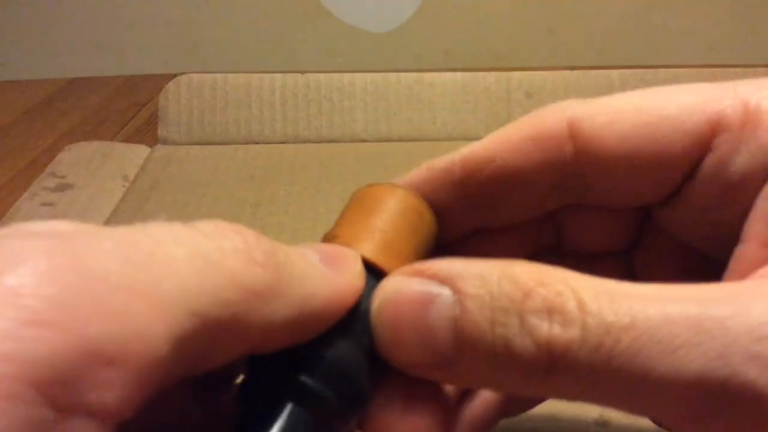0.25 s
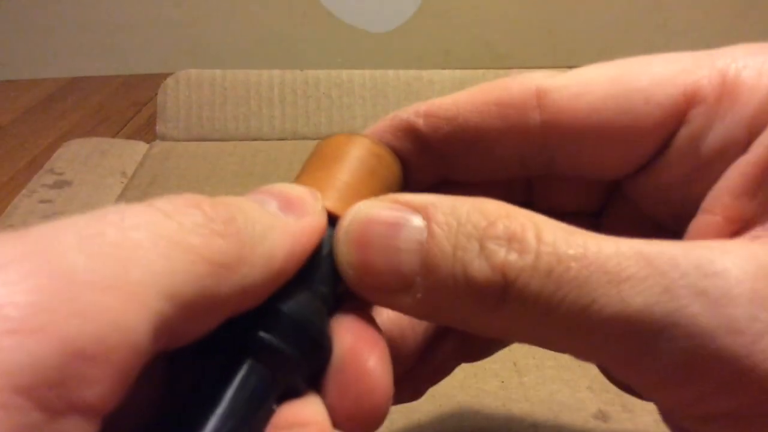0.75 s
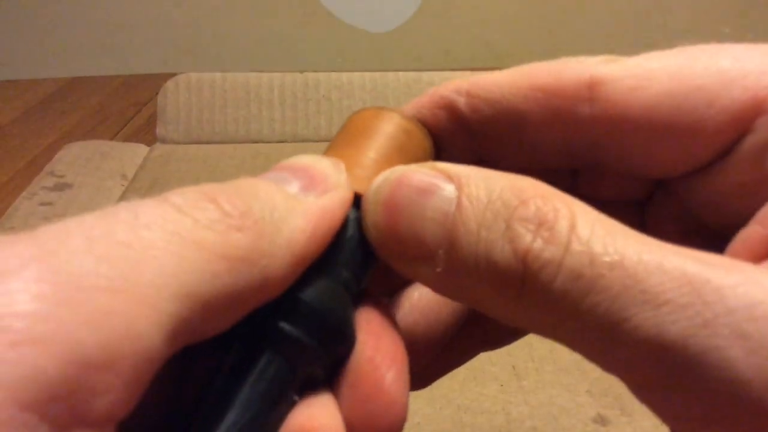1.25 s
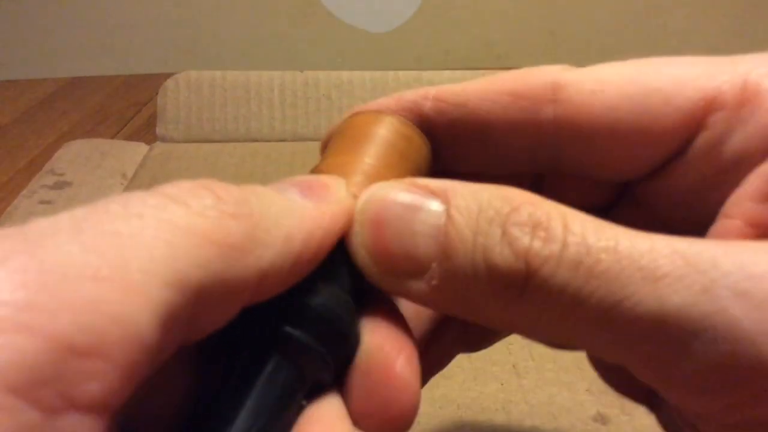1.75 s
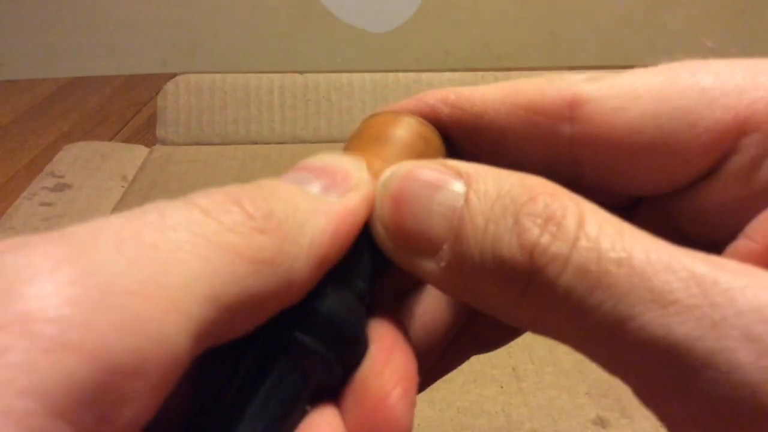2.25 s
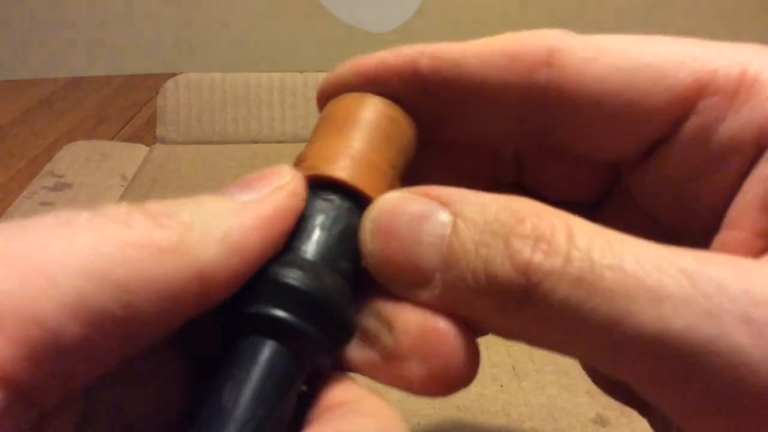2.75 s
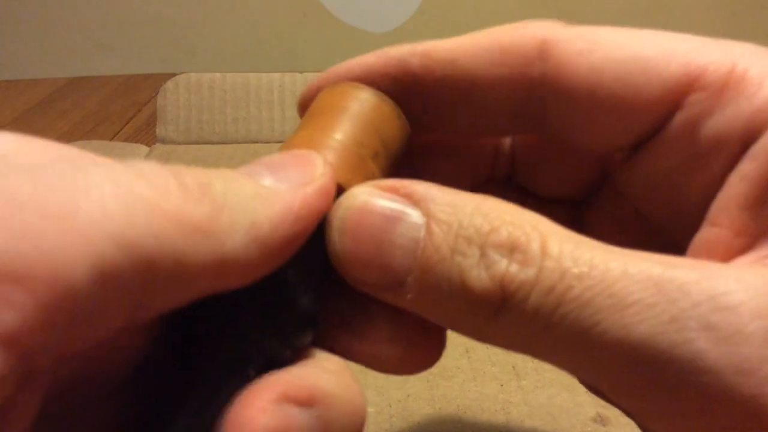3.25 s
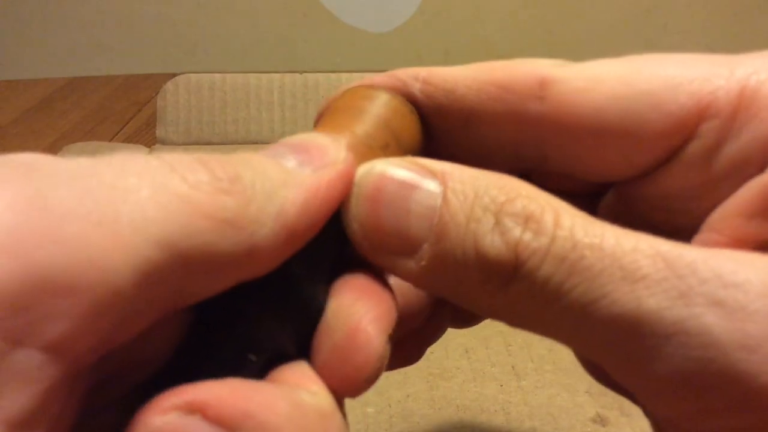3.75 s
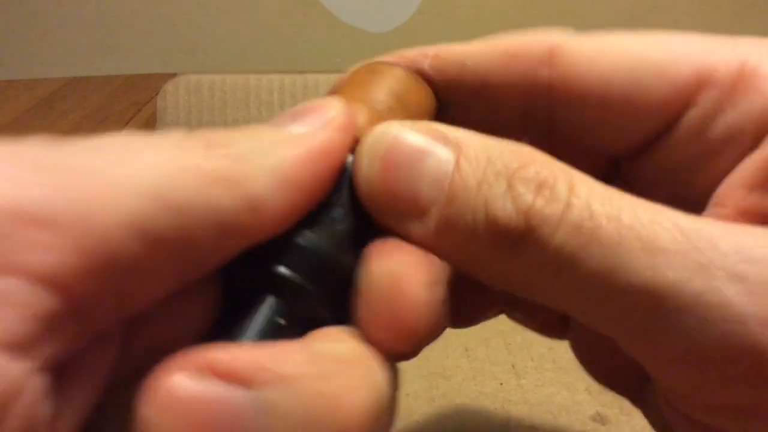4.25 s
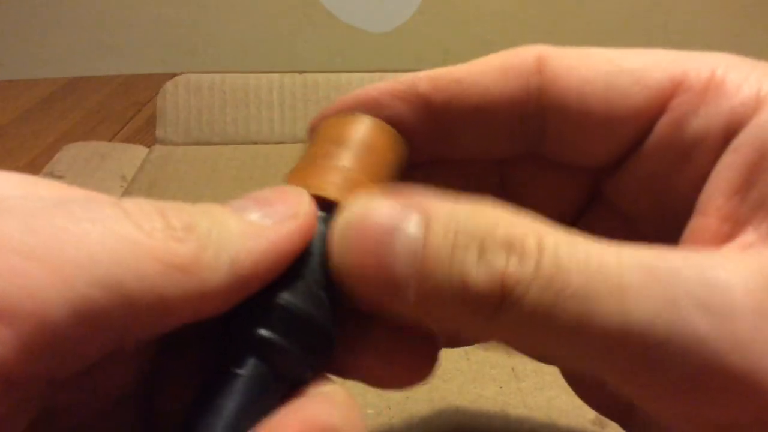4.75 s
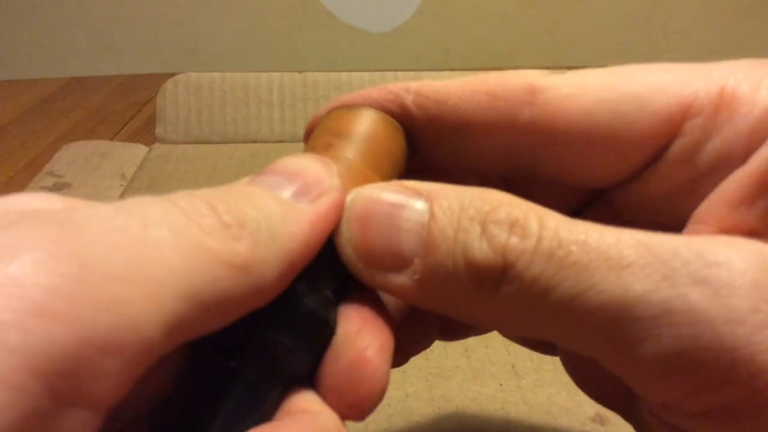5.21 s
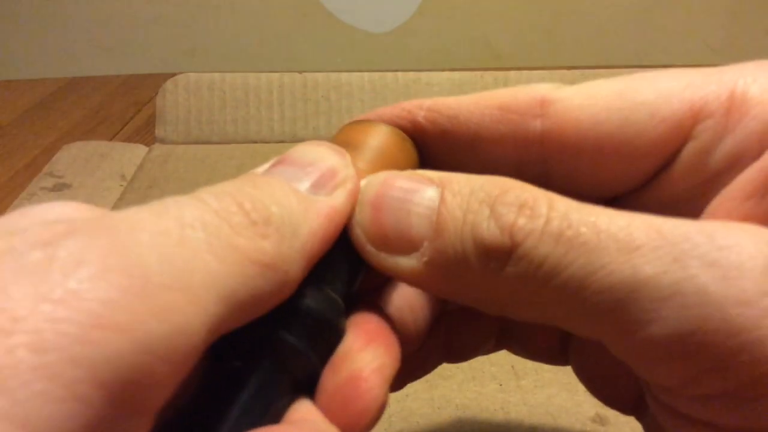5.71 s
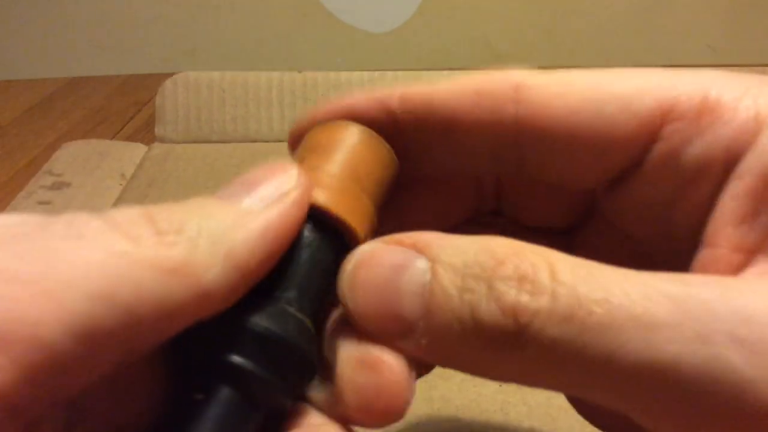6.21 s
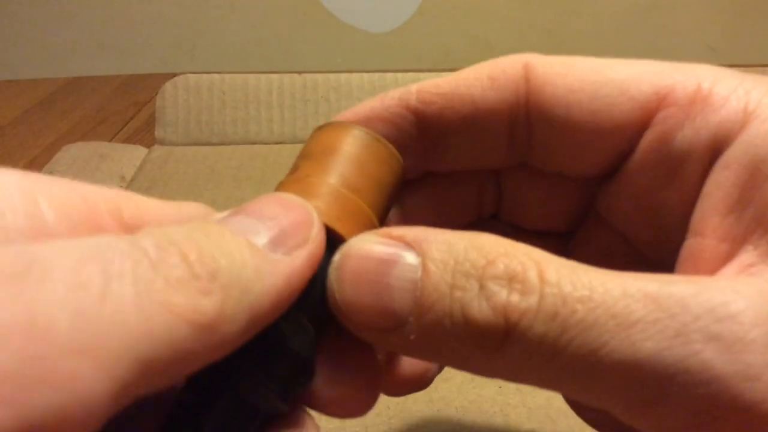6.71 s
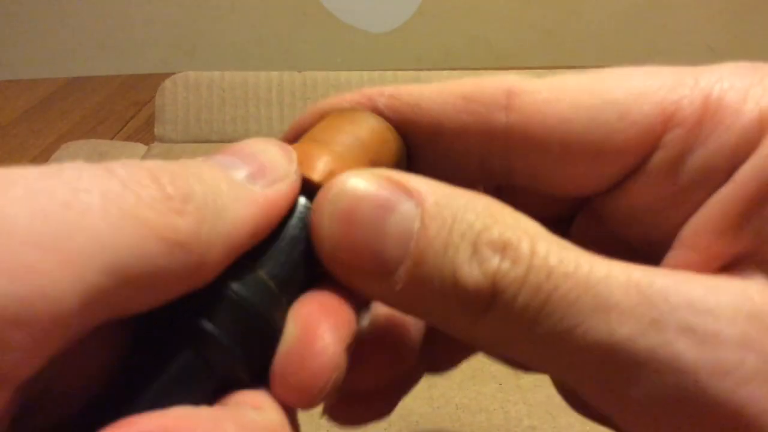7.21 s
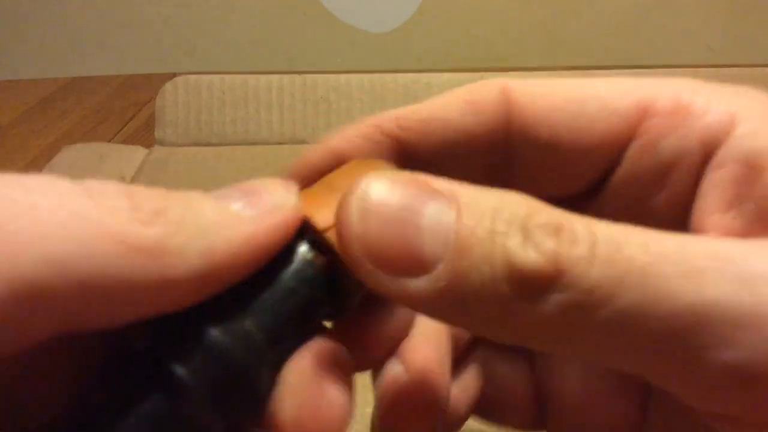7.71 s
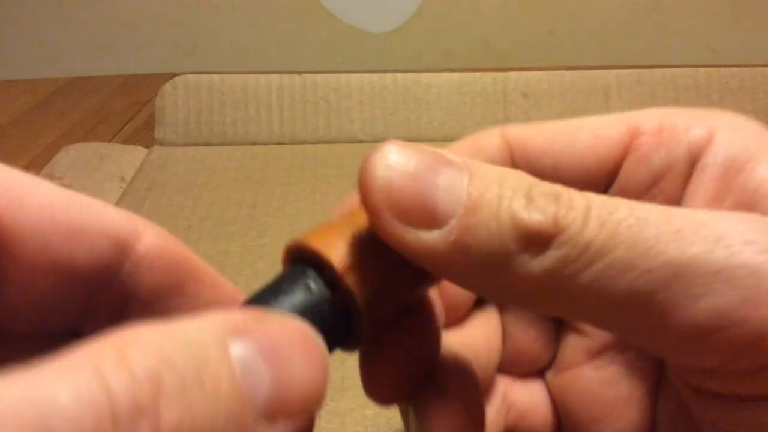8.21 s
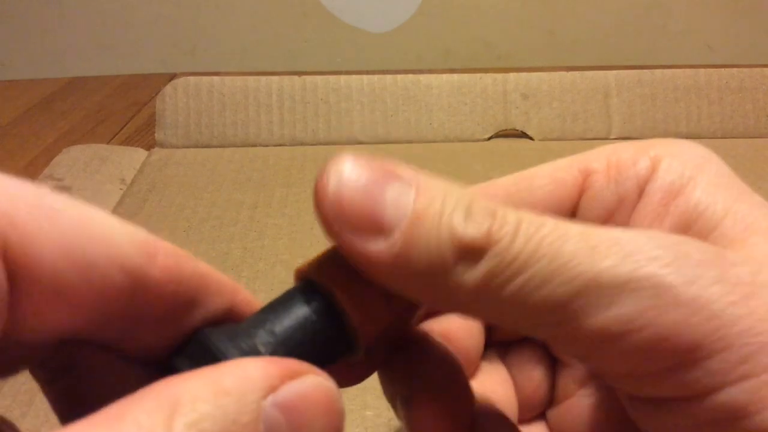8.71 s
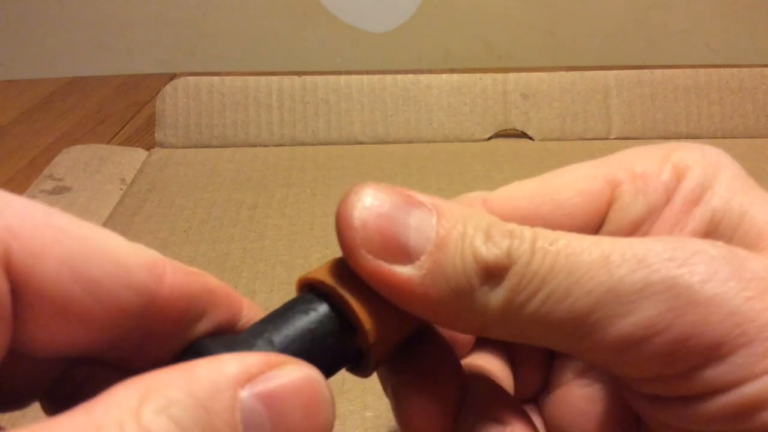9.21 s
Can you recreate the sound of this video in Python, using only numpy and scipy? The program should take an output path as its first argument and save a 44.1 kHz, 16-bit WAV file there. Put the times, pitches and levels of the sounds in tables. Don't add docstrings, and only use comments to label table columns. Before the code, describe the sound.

Close, soft skin-on-rubber friction with small table knocks, brittle peeling snaps, a muted pop and later a big sharp pop over low room hum.

```python
import sys
import numpy as np
from scipy import signal
from scipy.fft import rfft, irfft, next_fast_len
from scipy.io import wavfile

SR = 44100
rng = np.random.default_rng(int(sys.argv[2]) if len(sys.argv) > 2 else 0)


def makeup_ratio(level_db):
    decades = np.asarray(level_db, float) / 20
    return 10 ** decades


def wav_record(signal):
    frames = np.transpose(np.atleast_2d(signal))
    bounded = np.clip(frames, -1, 1)
    quanta = np.round(bounded * 32767).astype(np.int16)
    wavfile.write(sys.argv[1], SR, quanta)


N = 417186

# [f/Hz, level/dB per Hz]
ROOM_SPECTRUM = [(50, -8), (100, -7), (230, -0.75), (300, -2), (400, -8), (546, -11), (750, -20.5),
                 (1140, -24.5), (2000, -33), (2400, -30.5), (4300, -28.5), (7000, -40.5), (14300, -28.5)]
# [f/Hz, level/dB rms]
APPLIANCE_TONES = [(97, -73.5), (221, -71), (318, -74.5), (538, -72), (587, -78), (738, -80.5)]
# [t/s, level/dB, swell/s, t60/s]
RATTLES = [
    (0.479, -48.5, 0.034, 0.21),
    (4.484, -44, 0.008, 0.074),
    (5.912, -43.5, 0.0094, .15),
    (0.24, -62, 0.0065, 0.045),
]
# [t/s, cardboard peak level/dB, boom level/dB, edge level/dB, t60/s]
KNOCKS = [(0.002, -61, -52, -53, 0.15), (0.2622, -35.5, -37, -41.5, 0.05),
          (0.4761, -25.5, -28, -20.5, 0.26), (1.375, -95.5, -55, -76, 0.13), (1.6, -74, -52, -73, 0.27),
          (4.482, -28.5, -34.5, -28.5, 0.11), (5.908, -64, -38, -12, 0.075), (6.038, -58, -54, -61, 0.1),
          (6.109, -49.5, -49, -65, 0.17), (7.08, -49, -47, -60, 0.12), (7.887, -38, -43.5, -46, 0.027),
          (8.133, -42.5, -46, -63.5, 0.2)]
# [f/Hz, level/dB, share of t60]
TABLE_MODES = [(79.6, 7, 1), (108, 4.5, 0.76), (142, 1, 1.3)]
# [f/Hz, level/dB, share of t60]
CARD_MODES = [(308.2, 7.5, 0.45), (382, -5.5, 0.88), (505.7, -8, 0.84), (688, -25.5, 0.53)]
# [f/Hz, level/dB, share of t60]
EDGE_MODES = [(976, -7.5, 0.62), (1110, 1, 0.1484), (1450, -3, 0.13), (1570, 3.5, 0.052),
              (1757, -5.5, 0.058), (2260, 1, 0.08), (2800, -15.5, 0.22)]
# [t/s, peak level/dB, f/Hz, t60/s]
PLOPS = [(0.44, -50, 1420, 0.025), (2.8942, -49, 1670, 0.025), (2.9244, -50, 1570, 0.022),
         (2.9641, -53, 1650, .012), (3.0122, -48.5, 1560, 0.015), (3.0193, -53, 1600, 0.023),
         (3.0504, -60, 1800, .015), (5.882, -35, 1450, 0.02), (5.9064, -20, 4100, .008),
         (5.879, -32, 4400, .01), (7.889, -51, 2330, 0.03), (9.0717, -52.5, 2330, 0.0058)]
# [t/s, peak
# level/dB, f/Hz]
NAIL_TICKS = [(0.41, -46, 2310), (0.4384, -46, 3080), (3.7025, -55, 3340), (3.777, -54, 4180),
              (3.908, -53, 3150), (4.2522, -56, 2910), (4.75, -52, 3040), (5.2214, -60, 3130),
              (5.3961, -61, 2900), (5.4964, -53, 3260), (5.5458, -52, 3140), (5.5648, -50, 2850),
              (6.097, -52, 2170), (6.278, -53, 2330), (6.4781, -57, 1878), (8.206, -54.5, 2330)]
# [f/Hz, level/dB per Hz]
SKIN_SPECTRUM = [(1200, -16.5), (3000, -11), (4760, -11.5), (6000, -12.5), (8000, -11.5), (10500, -11.5),
                 (14000, -7), (15500, -7)]
# [t/s, tilt added to the hiss/dB per octave]
TIGHTNESS = [(0.0, -2.5), (0.4, -0.5), (2.59, -1), (3.96, 0), (4.05, 4.5), (4.33, -0.5), (4.79, 7.5),
             (5.09, -2), (5.58, -1), (5.66, 4.5), (5.75, 8.5), (5.86, 3), (5.93, -3.5), (6.33, 0), (6.4, 6),
             (6.5, 2.5), (6.86, 0), (9.46, 0.5)]
# [peak t/s, hiss level/dB, rise/s, fall/s]
TWISTS = [(0.024, -53.5, 0.071, 0.015), (0.49, -58.5, 0.35, 0.35), (0.62, -59.5, 0.2, 0.42),
          (1.017, -62.5, 0.24, 0.3), (1.55, -59, 0.051, 0.071), (1.68, -61.5, 0.41, 0.26),
          (2.356, -53.5, 0.13, 0.053), (2.702, -58, 0.088, 0.15), (2.9, -63.5, 0.34, 0.2),
          (3.134, -68.5, 0.8, 1), (3.972, -57, 0.014, 0.055), (4.02, -64, 0.011, 0.076),
          (4.387, -58, 0.18, 0.17), (4.556, -55, 0.13, 0.21), (4.72, -58, 0.29, 0.18),
          (4.85, -61, .1, 0.058), (5.625, -55.5, 0.011, 0.09), (5.69, -54.5, 0.11, 0.06),
          (5.875, -40.5, 0.061, 0.076), (5.96, -53, 0.057, 0.11), (6.137, -57, 0.21, 0.29),
          (6.432, -54.5, 0.15, 0.079), (6.86, -60.5, 0.054, 0.11), (6.97, -70.5, 0.06, 0.18),
          (7.103, -50.5, 0.081, 0.22), (7.269, -52.5, 0.07, 0.13), (7.66, -51.5, 0.11, 0.13),
          (7.895, -50.5, 0.011, 0.058), (8.026, -54, 0.098, 0.11), (8.244, -61, 0.079, 0.12),
          (8.58, -69.5, 0.58, 0.12)]
# [peak t/s, hiss level/dB]
BRUSHES = [(0.27, -59.5), (1.458, -60.5), (1.81, -60), (1.988, -61.5), (2.078, -59), (2.24, -74),
           (2.595, -57.5), (3.368, -60.5), (2.865, -56.5), (3.518, -60), (5.099, -64.5), (5.238, -61.5),
           (5.34, -66), (5.482, -67.5), (5.777, -54.5), (7.7, -58), (8.369, -60.5), (8.69, -69)]
# [peak t/s, hollow level/dB, squeeze level/dB, length/s]
PRESSES = [(0.016, -54, -58, 0.03), (0.32, -66, -65.5, 0.2), (0.503, -80, -46, 0.11),
           (1.02, -67.5, -73, 0.26), (2.34, -57, -52.5, 0.042), (2.686, -54, -66, 0.035),
           (3.37, -65, -68, 0.089), (4.488, -54, -41, 0.037), (5.085, -68, -85, 0.15),
           (5.887, -62, -45, 0.031), (6.058, -59, -45.5, 0.032), (6.073, -74, -55.5, 0.025),
           (6.128, -66, -48, 0.028), (6.162, -67, -52.5, 0.061), (6.217, -64, -51.5, 0.044),
           (6.437, -75.5, -60.5, 0.092), (6.872, -62.5, -60, 0.16), (6.955, -69, -65.5, 0.15),
           (7.078, -56, -67, 0.052), (7.111, -50.5, -48.5, 0.074), (7.169, -50.5, -50, 0.077),
           (7.266, -52.5, -46, 0.054), (7.296, -50, -60, 0.045), (7.648, -51.5, -47, 0.083),
           (7.696, -72, -47, 0.038), (7.905, -49.5, -46, 0.018), (8.022, -63, -58.5, 0.11),
           (8.236, -69.5, -54.5, 0.11), (8.37, -71, -67, .05)]
# [peak t/s, level/dB, length/s]
CUPPINGS = [(0.01, -73, .04), (0.392, -78, 0.24), (0.514, -60, 0.1), (1.468, -69, 0.035),
            (1.556, -52, 0.038), (2.24, -100, 0.087), (2.71, -65, 0.045), (2.888, -72, .05),
            (2.995, -74, 0.12), (3.29, -69, 0.1), (4.386, -59, 0.07), (4.616, -56, 0.071),
            (5.018, -65, 0.057), (5.687, -74, .06), (5.901, -42, 0.013), (6.005, -57.5, 0.077),
            (6.295, -69.5, 0.22), (6.952, -73, .2), (7.098, -74, 0.14), (7.661, -71, 0.071),
            (7.804, -67, 0.11), (7.906, -55.5, 0.018), (8.036, -61.5, 0.094), (8.247, -64, .1),
            (8.359, -63, 0.058), (8.453, -67.5, .05), (9.2, -69.5, 0.2), (9.4, -68, 0.31)]
# [t/s, f/Hz]
GRIP_RESONANCE = [(3.0, 1580), (3.249, 1686), (4.34, 1520), (4.419, 1693), (4.62, 1849), (4.999, 1532),
                  (5.899, 1450), (6.3, 1792), (7.93, 1694), (7.971, 2740), (8.13, 2688), (8.17, 1846),
                  (8.45, 2118), (9.001, 1730)]
# [t/s, peak level/dB, loudest f/Hz, t60/s]
SNAPS = [(0.2633, -41, 7050, 0.031), (0.4095, -31, 14700, 0.023), (0.473, -31.5, 12800, 0.025),
         (2.3106, -14.5, 12700, 0.015), (2.325, -7.5, 13900, 0.0076), (2.3293, -19, 8100, 0.017),
         (2.3369, -12, 7440, 0.0034), (2.3404, -14.5, 7800, 0.0023), (2.3487, -12.5, 5500, 0.011),
         (2.354, -22, 7250, 0.029), (2.3663, -27, 6440, 0.0043), (3.9615, -17.5, 8870, 0.0089),
         (3.9752, -29.5, 13200, 0.0022), (4.0164, -36.5, 8960, 0.027), (4.4807, -31.5, 3540, 0.048),
         (5.6132, -17, 9300, 0.0098), (5.685, -30, 10500, 0.0059), (5.7052, -23.5, 12000, .0093),
         (5.7603, -28, 10100, 0.0089), (5.778, -26.5, 12520, 0.032), (5.7887, -27.5, 10530, 0.0042),
         (5.806, -35.5, 10260, 0.031), (5.8282, -25, 10390, 0.0072), (5.8518, -22.5, 13600, .013),
         (5.8564, -21.5, 10490, 0.0092), (5.8781, -14, 9670, 0.026), (5.908, -7.5, 13550, 0.0077),
         (7.3636, -32, 7000, 0.0084), (9.071, -31, 12000, 0.0094)]
# [t/s, peak level/dB]
TICKS = [(0.5852, -44), (1.3037, -55), (1.3705, -50), (1.4011, -42), (1.4045, -41.5), (1.4769, -44),
         (2.3225, -25), (2.2583, -31), (2.2814, -48), (2.2930, -32), (2.3048, -28), (2.4189, -44),
         (2.7466, -45), (2.7549, -44), (3.86, -43), (3.9366, -46), (4.0394, -34), (4.2558, -47),
         (4.2895, -44), (5.5659, -37), (2.3768, -32), (5.7211, -29), (5.8184, -30.5), (5.8451, -33.5),
         (6.2262, -42), (6.2733, -41.5), (7.0542, -38.5), (9.236, -50.5),
         (3.9513, -44), (3.9687, -25), (4.0140, -39.5), (4.023, -37), (5.6806, -35), (5.7351, -44),
               (5.7813, -29), (5.812, -36.5), (5.834, -38), (5.8483, -26.5), (5.8656, -24.5),
               (5.881, -23.5), (9.426, -45)]
# [t/s, peak level/dB, f/Hz, t60/s]
FIRST_CRACK = (5.9068, -16, 9000, .005)
# [t/s, peak level/dB, start f/Hz, end f/Hz, rise/s, t60/s]
POPS = [
    (4.4809, -18, 600, 620, .0029, .018),
    (5.90785, -3, 1500, 1400, .0006, .015),
    (5.9078, -19, 560, 560, .0012, .022),
]

ROOM_DB = -63.5
ROOM_T60_S, ROOM_WET_DB, WALL_CUT_HZ = 0.22, -19.5, 1100
RATTLE_LOW_HZ, RATTLE_HIGH_HZ = 748, 1900
BODY_LAG_S = 0.004
NAIL_T60_S, NAIL_DB = 0.005, 0.5
BRUSH_RISE_S, BRUSH_FALL_S = 0.045, 0.027
STROKE_DEPTH_DB = 18.5
REST_DB, HOLLOW_REST_DB, SQUEEZE_REST_DB, CAVITY_REST_DB = -75, -89, -73.5, -95.5
HOLLOW_BELOW_DB = 16.5
FLICKER_DB, FLICKER_PER_S = 1.1, 12
COLOUR_DB, COLOUR_PER_S = 2.0, 3
TICK_HZ, TICK_T60_S, TICK_SPREAD = 12700, 0.007, 0.1
HEAD_S, HEAD_GAIN = 0.0003, 0.9
BROAD_SHARE = 0.6
MID_SHARE, MID_LOSS_DB = 0.13, 2.2
MIC_LOW_HZ, MIC_TOP_HZ = 55, 15400


def rms_one(x):
    return x / np.sqrt(np.mean(x ** 2) + 1e-20)


def add(out, s, burst):
    at = max(round(s * SR), 0)
    out[at:at + len(burst)] += burst[:N - at]


def drift(rate):
    r = np.exp(-80 * np.pi * rate / SR)
    white = rng.standard_normal(N // 40 + 2002)
    slow = signal.lfilter([1], [1, -2 * r, r * r], white)[2000:]
    return np.interp(np.arange(N) / 40, np.arange(len(slow)), rms_one(slow))


def ring(clicks, hz, t60):
    r, w = makeup_ratio(-60 / (t60 * SR)), 2 * np.pi * hz / SR
    return signal.lfilter([0, np.sin(w)], [1, -2 * r * np.cos(w), r * r], clicks + 1e-18)


def band(x, low_hz, high_hz):
    edges = [low_hz, min(high_hz, 0.48 * SR)]
    return signal.sosfilt(signal.butter(2, edges, "band", fs=SR, output="sos"), x)


def coloured(x, spectrum):
    hz, level_db = np.transpose(spectrum)
    grid = np.maximum(np.fft.rfftfreq(N, 1 / SR), 1)
    gain = makeup_ratio(np.interp(np.log(grid), np.log(hz), level_db))
    return rms_one(irfft(rfft(x) * gain, N))


def grit(per_s, spread_db):
    sizes = makeup_ratio(spread_db * np.minimum(rng.exponential(1, N), 5)) * rng.choice([-1, 1], N)
    catches = sizes * (rng.random(N) < per_s / SR)
    return rms_one(rng.standard_normal(N) + 3.2 * catches)


def strokes(rows, rest_db):
    t, power = np.arange(0, N + 40, 40) / SR, makeup_ratio(2 * rest_db)
    for s, db, rise, fall in rows:
        away = np.where(t < s, (s - t) / max(rise, 0.005), (t - s) / max(fall, 0.005))
        power = power + makeup_ratio(2 * (db - STROKE_DEPTH_DB * np.minimum(away, 10)))
    return np.interp(np.arange(N) / SR, t, np.sqrt(power))


def hum():
    level = makeup_ratio(ROOM_DB + 0.6 * drift(7.7))
    out = level * coloured(rng.standard_normal(N), ROOM_SPECTRUM)
    for hz, db in APPLIANCE_TONES:
        out += makeup_ratio(db - 2.5) * rms_one(ring(rng.standard_normal(N), hz, 0.6))
    return out


def walls(x):
    size = next_fast_len(N + SR)
    w = 2 * np.pi * np.fft.rfftfreq(size)
    dull = 1 / (1 + 1j * w * SR / (2 * np.pi * WALL_CUT_HZ))
    answer = 0
    lags = (rng.uniform(0.0032, 0.038, 10) * SR).astype(int)
    for k, lag in enumerate(lags):
        loop = makeup_ratio(-60 * lag / SR / ROOM_T60_S) * dull * np.exp(-1j * w * lag)
        answer = answer + (-1) ** k * loop / (1 - loop)
    return irfft(rfft(x, size) * answer, size)[:N]


def rattles():
    out, t = np.zeros(N), np.arange(12000) / SR
    noises = rng.standard_normal((len(RATTLES), 2, 12000))
    for (s, db, swell, t60), (noise, wander) in zip(RATTLES, noises):
        grains = noise * makeup_ratio(3 * signal.lfilter([0.01], [1, -0.99], wander) / 0.07)
        body = band(grains, RATTLE_LOW_HZ, RATTLE_HIGH_HZ)
        body = rms_one(band(body, 0.69 * RATTLE_LOW_HZ, 1.3 * RATTLE_HIGH_HZ))
        decay = makeup_ratio(db - 60 * np.maximum(t - swell, 0) / t60)
        add(out, s, decay * np.minimum(0.4 + t / swell, 1) * body)
    return out


def knocks():
    out, t = np.zeros(N), np.arange(16000) / SR
    noises = rng.standard_normal((len(KNOCKS), 16000))
    for (s, card_db, boom_db, edge_db, t60), noise in zip(KNOCKS, noises):
        bodies = [(TABLE_MODES, boom_db, 0.008, BODY_LAG_S),
                  (CARD_MODES, card_db, 0.08, BODY_LAG_S),
                  (EDGE_MODES, edge_db, 0.07, 0)]
        for modes, level_db, rattle, lag in bodies:
            contact = noise * np.exp(-t / (rattle * t60))
            contact[0] += 25
            part = sum(makeup_ratio(db) * ring(contact, hz, max(share * t60, 0.004)) for hz, db, share in modes)
            part = band(part, 0.7 * modes[0][0], 1.3 * modes[-1][0])
            add(out, s + lag, makeup_ratio(level_db) * part / np.abs(part).max())
    return out


def plops():
    out = np.zeros(N)
    rows = PLOPS + [(s, db + NAIL_DB, hz, NAIL_T60_S) for s, db, hz in NAIL_TICKS]
    noises = rng.standard_normal((len(rows), 3000))
    for (s, db, hz, t60), noise in zip(rows, noises):
        push = noise * np.exp(-np.arange(3000) / (0.0007 * SR))
        plop = ring(push, hz, max(t60, 0.003))
        add(out, s, makeup_ratio(db) * plop / np.abs(plop).max())
    return out


def friction_hiss():
    skin = coloured(grit(570, spread_db=3.0), SKIN_SPECTRUM)
    tilt_db = np.interp(np.arange(N) / SR, *np.transpose(TIGHTNESS))
    edges = 1000 * 2 ** np.arange(0, 4.5, 0.5)
    out = np.zeros(N)
    for k, (low, high) in enumerate(zip(edges, edges[1:])):
        level_db = tilt_db * np.log2(low / 8000)
        level_db = level_db + FLICKER_DB * drift(FLICKER_PER_S) + COLOUR_DB * drift(COLOUR_PER_S)
        out += (-1) ** k * makeup_ratio(level_db) * band(skin, low, high)
    return out


def hollow_ring(hz, t60):
    return rms_one(ring(ring(grit(650, spread_db=4.0), hz, t60), hz, t60))


def grip_cavity(width_hz):
    hz = np.interp(np.arange(N) / SR, *np.transpose(GRIP_RESONANCE))
    turn = 2 * np.pi * np.cumsum(hz) / SR
    lowpass = signal.butter(2, width_hz, fs=SR, output="sos")
    slow = signal.sosfilt(lowpass, grit(340, spread_db=4.0))
    return rms_one(slow * np.cos(turn) + slow[::-1] * np.sin(turn))


def squeeze_creak():
    modes = [(370, -3), (600, 1.5), (750, -7)]  # f/Hz, level/dB
    return rms_one(sum(makeup_ratio(db) * ring(grit(150, spread_db=3.0), hz, 0.014) for hz, db in modes))


def sliding():
    brushes = [(s, db, BRUSH_RISE_S, BRUSH_FALL_S) for s, db in BRUSHES]
    hiss = strokes(TWISTS + brushes, REST_DB)
    pressed = strokes([(s, db, 0.66 * span, span) for s, db, _, span in PRESSES], HOLLOW_REST_DB)
    hollow = np.hypot(makeup_ratio(-HOLLOW_BELOW_DB) * hiss, pressed)
    squeeze = strokes([(s, db, 0.653 * span, span) for s, _, db, span in PRESSES], SQUEEZE_REST_DB)
    cavity = strokes([(s, db, 0.96 * span, span) for s, db, span in CUPPINGS], CAVITY_REST_DB)
    stutter = makeup_ratio(1.2 * drift(30))
    out = makeup_ratio(2.5) * hiss * friction_hiss()
    out += makeup_ratio(-2.1) * hollow * hollow_ring(2300, t60=0.0055)
    out += makeup_ratio(-2.1) * cavity * grip_cavity(width_hz=140)
    out += makeup_ratio(-3.0) * squeeze * squeeze_creak()
    return stutter * out


def snaps():
    out, t = np.zeros(N), np.arange(1600) / SR
    small = TICKS
    chances = rng.uniform(-0.98, 1, (len(small), 2))
    ticks = [(s, db, TICK_HZ * np.exp(TICK_SPREAD * a), TICK_T60_S * np.exp(0.29 * b))
             for (s, db), (a, b) in zip(small, chances)]
    rows = SNAPS + ticks + [FIRST_CRACK]
    bounce = round(0.0011 * SR)
    for (s, db, hz, t60), noise in zip(rows, rng.standard_normal((len(rows), 1600))):
        crackle = noise * makeup_ratio(-60 * t / max(t60, 0.002)) * np.minimum(t / 0.0001, 1)
        crackle *= 1 + HEAD_GAIN * np.exp(-t / HEAD_S)
        crackle[bounce:] += 0.05 * crackle[:-bounce]
        tight = np.clip(np.interp(s, *np.transpose(TIGHTNESS)), 0, 6)
        low_hz = 3300 * 2 ** (tight / 6)
        snap = BROAD_SHARE * band(band(crackle, low_hz, 17000), low_hz, 17000)
        snap += 0.87 * band(crackle, 0.85 * hz, 1.15 * hz)
        snap += 0.04 * band(crackle, 300, 3500)
        snap += MID_SHARE * makeup_ratio(-MID_LOSS_DB * tight) * band(crackle, 1400, 4500)
        add(out, s, makeup_ratio(db) * snap / np.abs(snap).max())
    return out


def pop():
    out, t = np.zeros(N), np.arange(2000) / SR
    for s, db, start_hz, end_hz, rise, t60 in POPS:
        hz = end_hz + (start_hz - end_hz) * np.exp(-t / 0.006)
        after = np.maximum(t - rise, 0)
        decay = 0.5 * makeup_ratio(-60 * after / t60) + 0.5 * np.exp(-after / (0.4 * rise))
        shape = np.minimum(t / rise, 1) ** 0.7 * decay
        add(out, s, -makeup_ratio(db) * shape * np.sin(2 * np.pi * np.cumsum(hz) / SR))
    return out


def scene():
    hits = rattles() + knocks() + plops() + snaps() + pop()
    return (hum() + makeup_ratio(ROOM_WET_DB) * walls(hits) + sliding() + hits)[None]


def top_cut(x):
    return signal.sosfilt(signal.butter(12, 16460, fs=SR, output="sos"), x)


def record(dry):
    thin = signal.sosfilt(signal.butter(2, MIC_LOW_HZ, "high", fs=SR, output="sos"), dry)
    rounded = 1.5 * np.tanh(thin / 1.5)
    mix = signal.sosfilt(signal.cheby2(14, 30, MIC_TOP_HZ, fs=SR, output="sos"), rounded)
    return top_cut(mix)


dry = scene()
out = record(dry)
wav_record(out)
```